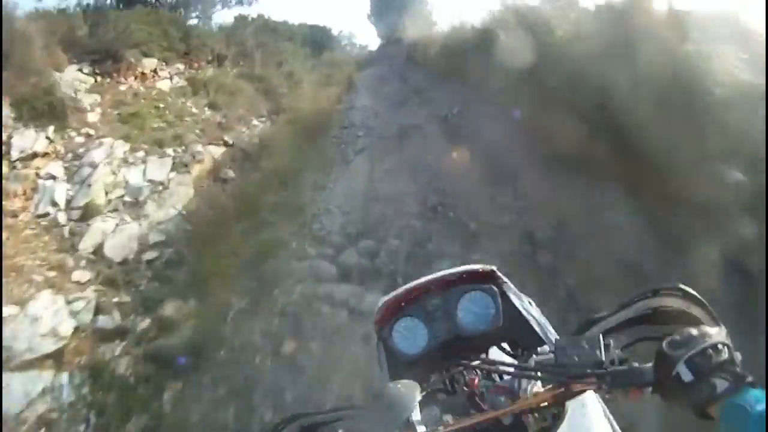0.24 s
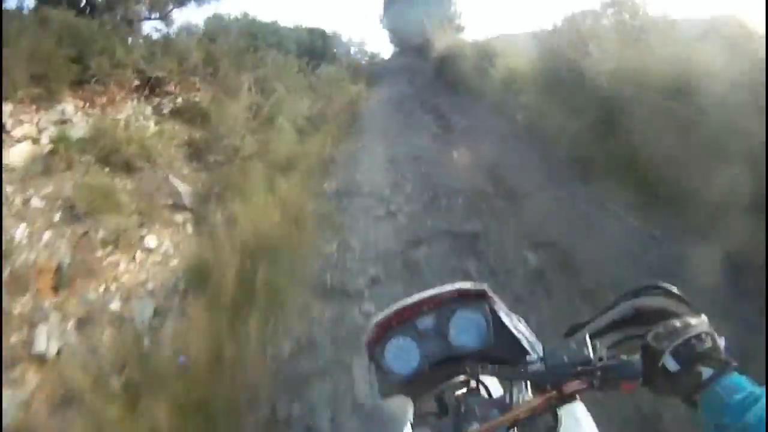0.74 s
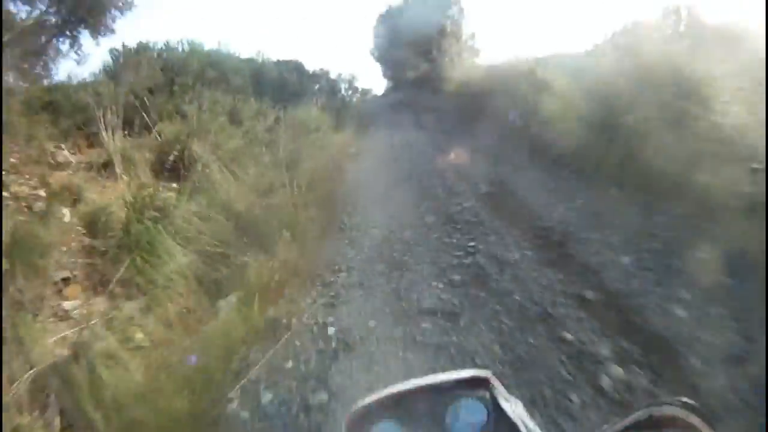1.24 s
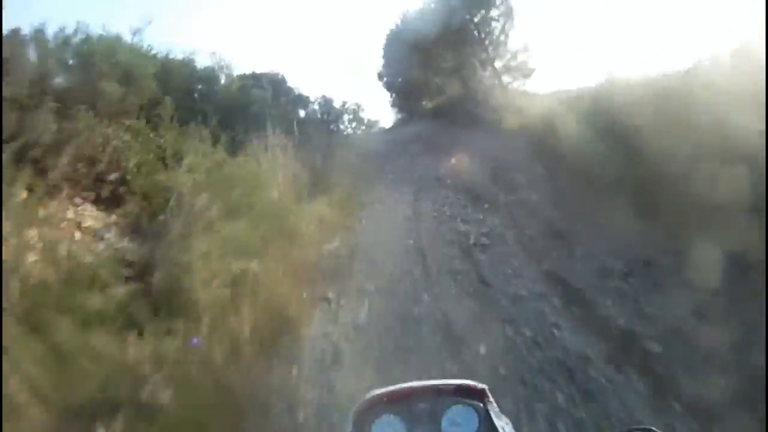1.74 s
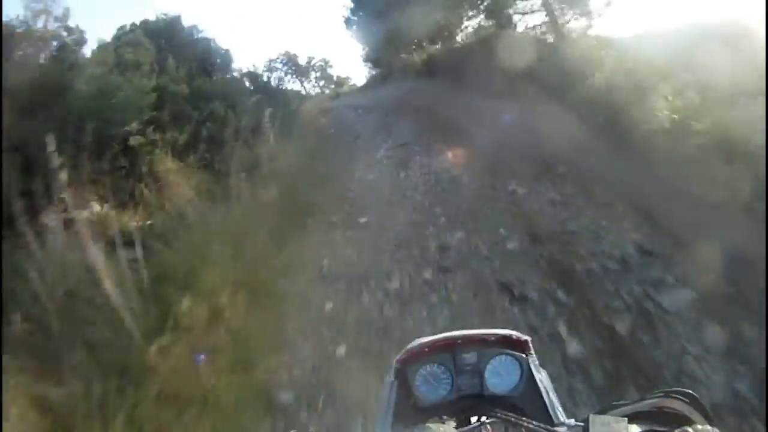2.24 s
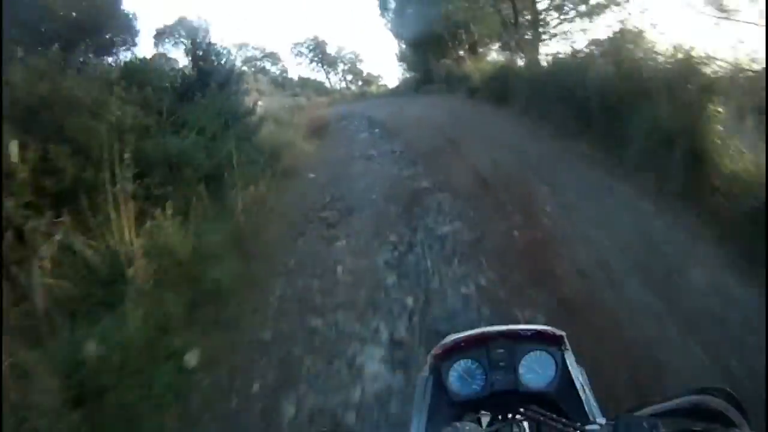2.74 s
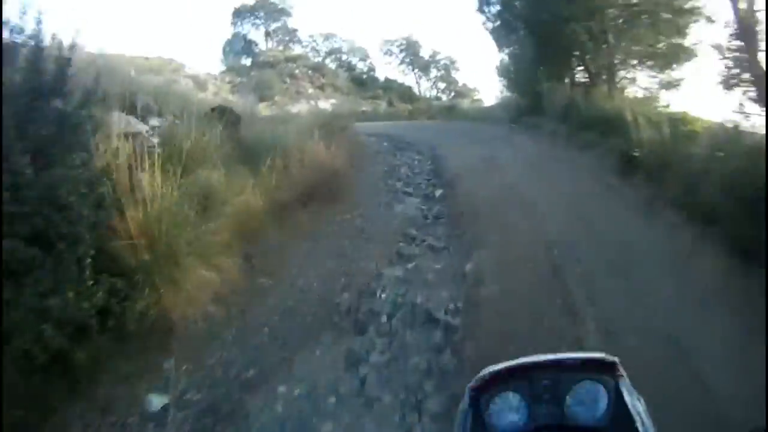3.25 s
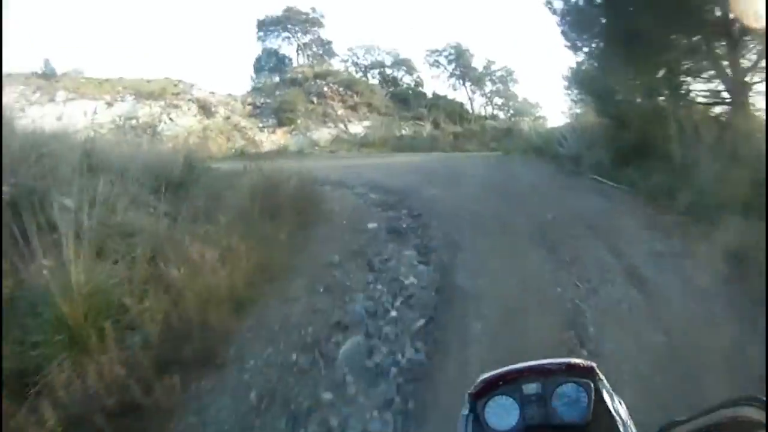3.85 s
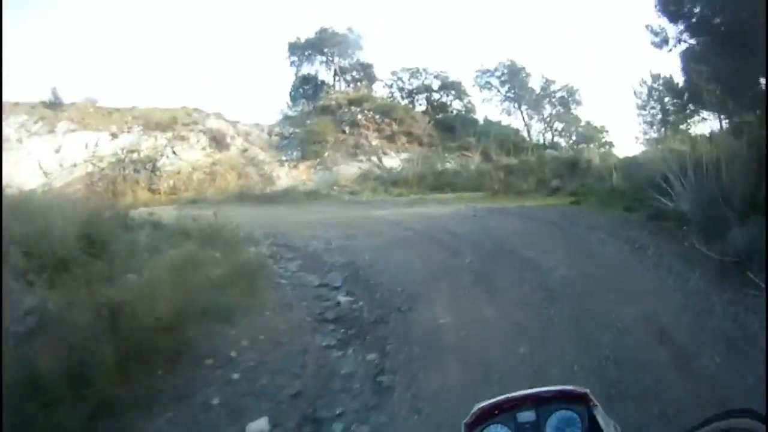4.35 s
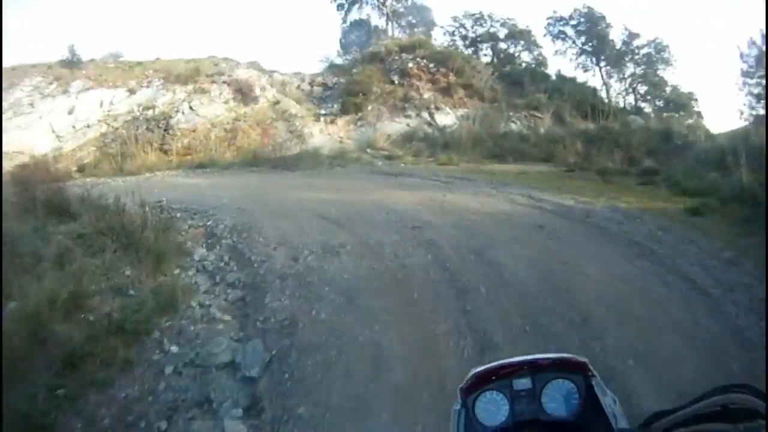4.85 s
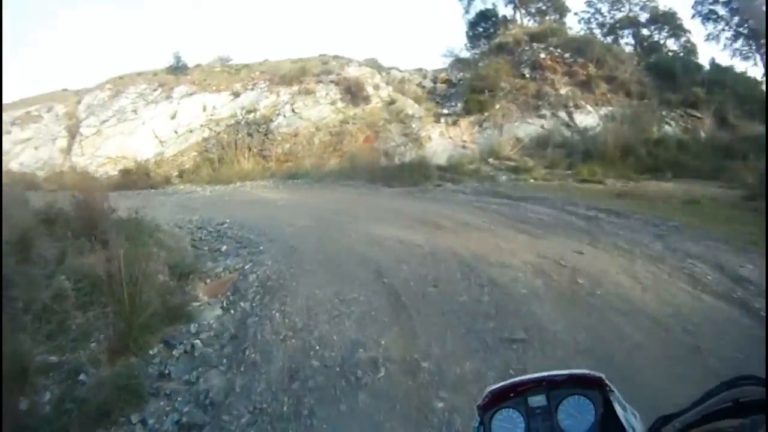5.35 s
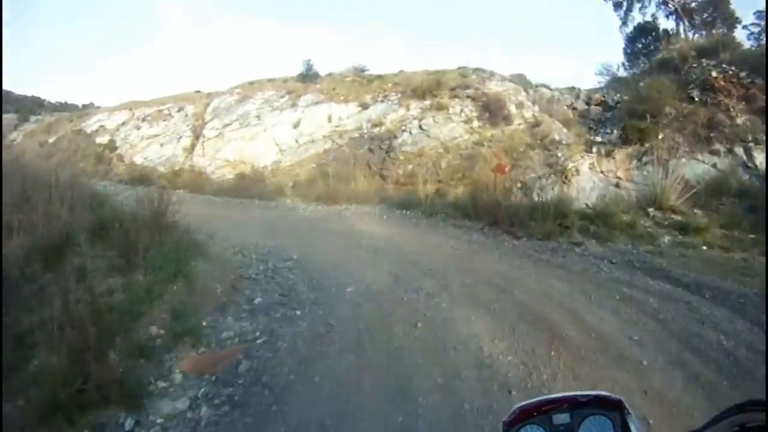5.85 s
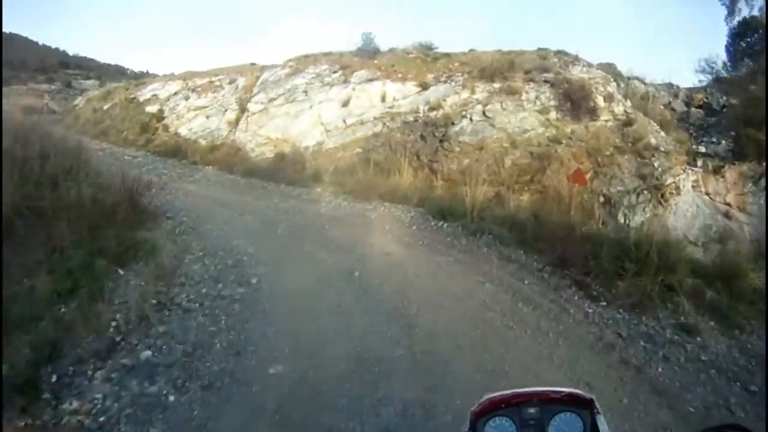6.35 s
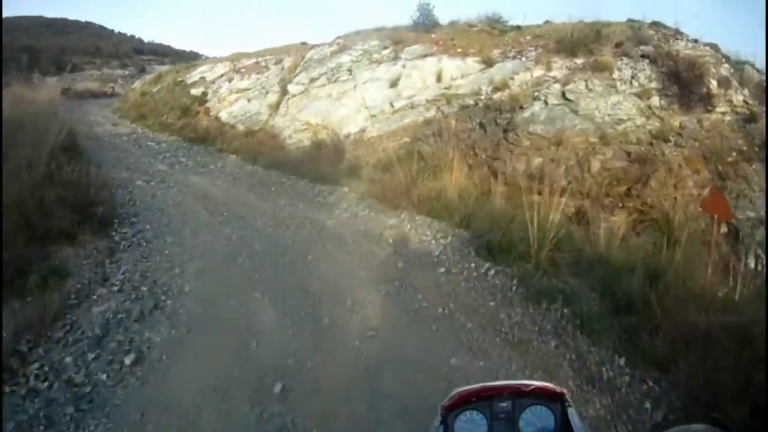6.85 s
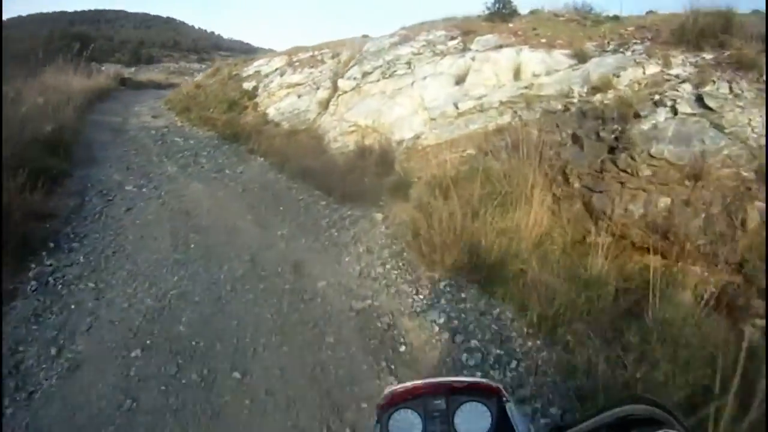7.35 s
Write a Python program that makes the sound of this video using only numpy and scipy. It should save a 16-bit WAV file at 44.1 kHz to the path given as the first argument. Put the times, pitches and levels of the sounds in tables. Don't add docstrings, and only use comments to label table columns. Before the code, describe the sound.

A single-cylinder four-stroke trail bike is heard from onboard through a sealed, padded camera microphone, dry and mono. From 0 to 3.4 s it runs fast, about 25 blows a second, wavering as the rear wheel slips and grips. Throaty exhaust pulses, hard valve clatter and a rough gear whine near 1.2-1.8 kHz sit within strong rushing wind, low gusty booms and sharp gravel spray. At 3.4 s the throttle shuts; the pitch falls, jumps in a blip around 3.85 s with a short buzz, then lugs to about 15 blows a second with misfires until 4.9 s, while wind and stones drop away. From 5 s it pulls in bursts, strongest around 5.4-5.9 and 6.1-6.4 s, with frame knocks and a buzzing metal bracket. Revs dip near 7.25 s, then recover slightly to the end at 7.6 s. Treble is grainy, with a mirrored metallic haze.

```python
import sys
import numpy as np
from scipy import signal
from scipy.fft import rfft, irfft, next_fast_len
from scipy.io import wavfile
from scipy.ndimage import uniform_filter1d, map_coordinates

SR = 44100
rng = np.random.default_rng(int(sys.argv[2]) if len(sys.argv) > 2 else 0)


def invert_db(x):
    u = np.asarray(x, float) / 20
    return 10 ** u


def digitize_waveform(pressure):
    field = np.atleast_2d(pressure).T
    bounded = np.clip(field, -1, 1)
    quanta = np.round(bounded * 32767).astype(np.int16)
    wavfile.write(sys.argv[1], SR, quanta)


N = 335160
SHUT_DB = -51
CRUISE_DB, CRUISE_REVS = -50, 25


def unit(x):
    return x / np.sqrt(np.mean(x ** 2) + 1e-20)


def steady(x):
    return x / np.sqrt(np.abs(uniform_filter1d(x ** 2, size=SR // 2)) + 1e-20)


def curves(rows):
    s, *cols = np.transpose(rows)
    return [np.interp(np.arange(N) / SR, s, c) for c in cols]


def bumps(rows):
    t = np.arange(N) / SR
    return sum(height * np.cos(np.pi * np.clip((t - s) / length, -.5, .5)) ** 2 for s, length, height in rows)


def spells(rows, rest_db, rise, fall):
    t = np.arange(0, N + 64, 64) / SR
    tops = []
    for s, held, db in rows:
        early, late = np.clip(s - t, 0, None), np.clip(t - s - held, 0, None)
        tops.append(db - rise * early - fall * late)
    return np.maximum(rest_db, np.interp(np.arange(N) / SR, t, np.max(tops, axis=0)))


def wobble(rate):
    return map_coordinates(rng.standard_normal(N // 200 + 4), [np.arange(N) * rate / SR])


def grit(spike_db):
    spikes = np.minimum(rng.exponential(1, N), 6.5)
    return unit(rng.standard_normal(N) * invert_db(spike_db * spikes))


def filtered(x, response, top_hz=6600):
    m = next_fast_len(N + SR // 4)
    hz = np.arange(0, top_hz, SR / m)
    return irfft(rfft(x, m)[..., :len(hz)] * response(hz), m)[..., :N]


def slope(points):
    f, db = np.transpose(points)
    return lambda hz: invert_db(np.interp(np.log(hz + 1), np.log(f), db))


def modes(table, sign=1):
    def response(f):
        total = 0
        for k, (c, w, db) in enumerate(table):
            total = total + sign ** k * invert_db(db) * 1j * f * w / (c * c - f * f + 1j * f * w)
        return total
    return response


# t/s, firings a second [1/s]
CRANK_SPEED = [(0.0, 25.62), (1.02, 25.19), (3.35, 24.91), (3.44, 20.04), (3.69, 17.11), (3.89, 26.73),
               (4.28, 18.05), (4.48, 15.7), (4.96, 15.41), (5.04, 19.95), (5.57, 21.41), (6.28, 21.26),
               (6.39, 25.61), (6.74, 25.47), (6.86, 21.26), (7.03, 24.77), (7.28, 18.01), (7.6, 19.94)]
# centre t/s, length/s, extra firings a second [1/s]
WHEELSPIN = [
    (1.29, 0.51, 1.56),
    (1.96, 1.23, 3.3),
    (2.25, 0.76, -3.14),
    (2.44, 0.5, 2.43),
    (3.27, 0.2, 3.08),
    (3.55, 0.29, 1.41),
    (4.77, 0.31, 2.83),
    (5.25, 0.37, -1.42),
    (5.97, 0.49, 5.41),
    (7.35, 0.74, 1.59),
]


def crank_speed():
    return curves(CRANK_SPEED)[0] + bumps(WHEELSPIN)


MISFIRES = [
    3.52,
    4.07,
    4.75,
    4.86,
]


def crank(revs):
    turn = .14 + np.cumsum(revs) / SR
    at = np.flatnonzero(np.diff(np.floor(turn)))
    chance = rng.standard_normal((len(at), 2))
    strength = invert_db(1.08 * chance[:, 0])
    for s in MISFIRES:
        strength[np.argmin(np.abs(at / SR - s))] *= invert_db(-14)
    jitter = (.0008 * SR * chance[:, 1]).astype(int)
    firings = np.zeros(N)
    firings[np.clip(at + jitter, 0, N - 1)] = strength
    return firings


def after(firings, delay, rise):
    u = np.clip(np.arange(SR // 10) / SR - delay, 0, 1) / rise
    return signal.fftconvolve(firings, u * np.exp(1 - u))[:N]


# t/s, held/s, exhaust level/dB
THROTTLE = [(0, 0.0066, -37.5), (.12, .02, -46), (.44, .02, -36), (.55, 0.018, -39.5), (.7, 0.25, -43.5),
            (1.14, 0.089, -42.5), (1.27, 0.25, -38), (2.29, 0.062, -36.5), (2.62, 0.056, -36),
            (2.84, 0.071, -37.5), (3.2, 0.019, -39), (3.45, .02, -54), (3.83, 0.038, -37.5),
            (4.45, 0.14, -48.5), (4.7, .02, -42), (4.8, .03, -46), (4.99, 0.023, -38), (5.12, 0.2, -42.5),
            (5.35, 0.59, -37.5), (6.1, 0.021, -34.5), (6.27, .01, -39), (6.32, 0.037, -34.5),
            (6.65, 0.042, -37.5), (6.88, 0.063, -36), (7.19, 0.0091, -37.5), (7.28, 0.26, -43),
            (7.57, .05, -37.5)]


def throttle():
    return spells(THROTTLE, SHUT_DB, rise=143, fall=64.5) - SHUT_DB


# centre t/s, length/s, level/dB
SLACK = [
    (3.68, .05, 0),
    (4.88, .04, 4),
    (4.95, .07, -4),
    (6.24, .05, -7),
    (6.29, .03, -8),
    (7.22, 0.076, -13),
]


def chain_slack():
    return bumps(SLACK)


# f/Hz, width/Hz, level/dB
PIPE = [(236, 48, 0), (295, 45, -4), (415, 70, -3), (538, 32, 0), (605, 28, -3)]
# f/Hz, level/dB
PIPE_EDGE = [(120, -14), (200, 0), (640, 0), (800, -9), (1500, -26)]
# f/Hz, width/Hz, level/dB
THUD = [(52.5, 11, 5.5), (98.2, 11.4, -1)]


def exhaust(firings, level_db):
    def silencer(f):
        late = np.exp(-2j * np.pi * f * .005 * np.clip(f / 600, 0, 1))
        echo = 1 + .22 * np.exp(-2j * np.pi * f * .017)
        return modes(PIPE, sign=-1)(f) * slope(PIPE_EDGE)(f) * late * echo

    blow = unit(filtered(firings, silencer))
    thud = unit(filtered(firings, modes(THUD)))
    turbulence = after(firings, 0, .0028) * rng.standard_normal(N)
    gas = unit(filtered(turbulence, modes(PIPE, sign=-1.64)))
    return invert_db(level_db) * (blow + invert_db(-11) * gas) + invert_db(level_db + 1.5) * thud


# f/Hz, width/Hz, level/dB
CASE = [(1000, 170, -52.5), (1185.7, 26.4, 21), (1226, 55, 18.5), (1401, 180, 11.5), (1408, 140, 12),
        (1490, 30, 9), (1685, 53, -9)]
# f/Hz, level/dB
CASE_EDGE = [(600, -20), (900, -9), (1080, 0), (1800, 0), (2600, -14), (4000, -30)]
# centre t/s, length/s, level/dB
LASH = [
    (.56, 0.084, 1),
    (1.5, 0.34, 2.5),
    (1.75, 0.34, -3),
    (2.1, 0.38, -2),
    (3.5, 0.21, 5),
    (4.55, 0.37, -3.5),
    (5.42, 1, -4.5),
    (6.4, 0.38, 2),
    (6.95, 0.49, 2.5),
    (7.45, .4, 0),
]


def clatter(firings, revs, load_db, pace_db, slack_db):
    level_db = -29.5 + .42 * (revs - CRUISE_REVS) + .24 * load_db + .22 * pace_db
    level_db = level_db + slack_db + bumps(LASH)
    beat = .6 + .7 * after(firings, .006, .006)
    drive = beat * invert_db(1.2 * wobble(40)) * grit(spike_db=2.5)
    case = lambda f: modes(CASE)(f) * slope(CASE_EDGE)(f)
    return invert_db(level_db) * steady(filtered(drive, case))


# t/s, drive wind-up f/Hz, level/dB, speed ripple of one firing [0-1]
MESH = [(0, 0, -36, .08), (3.3, -40, -36, .08), (3.4, 40, -29, .03), (3.46, 70, -28, .03),
        (3.55, -20, -30, .04), (3.74, -110, -32, .05), (3.9, 30, -36, .1), (4.05, 10, -32, .04),
        (4.65, 50, -47, .05), (4.7, 50, -29, .12), (4.8, 0, -30, .1), (4.92, 80, -32, .1),
        (5.1, -40, -28, .15), (5.4, 35, -29, .15), (7.17, -10, -33, .09), (7.25, -110, -27, .07),
        (7.31, 30, -29, .1), (7.6, -30, -33, .1)]
# f/Hz, level/dB
GEARBOX = [(950, -22), (1120, 0), (1290, 0), (1335, -11), (1380, 0), (1540, -2), (1640, -18), (1900, -28)]


def whine(firings, revs):
    windup_hz, level_db, kick = curves(MESH)
    mean_hz = 68 * uniform_filter1d(revs, size=round(.16 * SR)) + windup_hz
    kicks = np.cumsum(firings)
    ripple = uniform_filter1d(kicks - uniform_filter1d(kicks, size=SR // 6), size=SR // 100)
    mesh_hz = mean_hz * (1 + kick * ripple + .004 * wobble(70))
    mesh = 2 * np.pi * np.cumsum(mesh_hz) / SR
    piston = 1 + .45 * np.sin(mesh / 17 + wobble(8)) + .25 * np.sin(mesh / 34 + wobble(8))
    bite = 1 + 2.5 * kick * (1.7 * after(firings, 0, .011) - 1)
    tone = bite * piston * invert_db(2 * wobble(40)) * np.sin(mesh)
    return invert_db(level_db + 2.5) * filtered(tone, slope(GEARBOX))


# t/s, length/s, level/dB
BUZZ = [
    (3.85, .14, -51),
    (5.36, .82, -48.5),
    (6.3, .82, -48.5),
    (7.45, .03, -54),
]
# f/Hz, width/Hz, level/dB
BRACKET = [(3080, 90, 0), (3670, 110, -1), (4610, 75, 0), (5400, 100, -4)]


def bracket(firings):
    uneven = firings * invert_db(1.5 * rng.standard_normal(N))
    jolts = after(uneven, .012, .002) + .7 * after(uneven, .034, .002)
    chatter = jolts * (1 + rng.standard_normal(N)) * rng.standard_normal(N)
    level_db = spells(BUZZ, rest_db=-75, rise=250, fall=250)
    return invert_db(level_db) * unit(filtered(chatter, lambda f: modes(BRACKET, sign=-1)(f) ** 2))


# t/s, peak level/dB, thump level/dB
KNOCKS = [(0.46, -12, -14), (1.406, -1, -31), (2.26, -8, -25), (3.785, -9, -11), (4.32, -18, -14),
          (4.675, -16, -8), (4.898, -30, -20), (4.988, -16, -19), (5.345, -23, -20), (5.672, -9.5, -16),
          (5.852, -12, -19), (6.267, -11, -16), (6.304, -13, -25), (6.316, -6.5, -24), (6.632, -15, -7),
          (6.88, -15, -19), (6.929, -11, -15), (7.187, -10, -14)]
# f/Hz, width/Hz, level/dB
FRAME = [(850, 600, -11), (1200, 300, 0), (1500, 300, -2), (2150, 500, -8), (3600, 900, -20)]


def knocks():
    t = np.arange(SR // 20) / SR
    hard, soft = np.zeros(N + SR), np.zeros(N + SR)
    for s, db, thump_db in KNOCKS:
        burst = invert_db(db - 60 * t / .03) * (1 - np.exp(-t / .001)) * rng.standard_normal(len(t))
        hard[round(s * SR):][:len(t)] += burst
        soft[round(s * SR):][:len(t)] += invert_db(thump_db) * burst
    knock = filtered(hard[:N], modes(FRAME, sign=-1))
    thump = filtered(soft[:N], modes(PIPE, sign=-1))
    return invert_db(9) * (knock + thump)


# f/Hz, width/Hz, level/dB
SHELL = [(1720, 15, -13), (2022, 175, -1.5), (2223, 157, 1), (2530, 120, -30)]
# f/Hz, level/dB
SHELL_EDGE = [(1200, -16), (1700, 0), (2500, 0), (3800, -8), (4200, -20)]


def shell(firings, pace_db, load_db):
    level_db = -35.5 + .68 * pace_db + .27 * load_db
    shake = .6 + .65 * after(firings, .004, .004)
    drive = shake * invert_db(1.6 * wobble(30)) * grit(spike_db=1.0)
    ring = lambda f: modes(SHELL, sign=-1)(f) * slope(SHELL_EDGE)(f)
    return invert_db(level_db) * steady(filtered(drive, ring))


# t/s, level/dB
PACE = [(0, -46.5), (.7, -47), (1.27, -46.5), (1.6, -45.5), (2.1, -49), (2.8, -52), (3.26, -50),
        (3.66, -57.5), (3.83, -52.5), (4.27, -61.5), (4.76, -69), (5.14, -65), (5.86, -58.5), (6.16, -61),
        (6.39, -59), (6.86, -62), (7.2, -64), (7.6, -67.5)]


def road_pace():
    return curves(PACE)[0] - CRUISE_DB


# f/Hz, width/Hz, level/dB
STONES = [(2780, 100, -1.5), (3070, 300, -5.5), (3550, 254, -3), (4610, 770, -12), (5290, 190, -14)]


def stones(pace_db):
    spray = steady(filtered(invert_db(wobble(14)) * grit(spike_db=3.0), modes(STONES)))
    return invert_db(CRUISE_DB + pace_db + 14.5) * spray


# f/Hz, level/dB
RUSH = [(20, -11), (120, -4.5), (300, -1), (700, -8.5), (1200, 1), (2500, -1.5), (3700, -14.5), (4100, -63),
        (5600, -18)]


def wind_rush(firings, pace_db, load_db):
    level_db = -31 + .91 * pace_db + .26 * load_db
    depth = np.clip(.018 * load_db, 0, .7)
    puff = 1 + depth * (2.0 * after(firings, .002, .006) - 1)
    air = unit(filtered(invert_db(2.55 * wobble(16)) * rng.standard_normal(N), slope(RUSH)))
    return invert_db(level_db) * puff * air


# t/s, boom level/dB
GUSTS = [(0, -16.5), (.23, -14.5), (.47, -17), (.6, -17.5), (.74, -16.5), (1.02, -25), (1.27, -23),
         (1.44, -19.5), (1.58, -23), (1.8, -23.5), (2.03, -19.5), (2.26, -18), (2.61, -20.5), (3.09, -23),
         (3.49, -24.5), (3.65, -22.5), (4.0, -32), (4.3, -29), (4.7, -31.5), (5.06, -30.5), (5.3, -31.5),
         (5.86, -30), (6.3, -34), (6.39, -34), (6.62, -33), (7.05, -30.5), (7.37, -29.5)]
# t/s, boom level/dB
LULL = [
    (0, -28),
    (2.2, -25),
    (2.8, -29.5),
    (4.4, -33.5),
    (5.7, -35),
    (7.6, -37),
]
# f/Hz, width/Hz, level/dB
BOOM = [(39.4, 30.4, -6), (88.4, 17.7, 1.5)]


def wind_boom():
    gusts = [(s, 0, db) for s, db in GUSTS]
    level_db = spells(gusts, rest_db=curves(LULL)[0], rise=76, fall=74)
    pressure = invert_db(1.7 * wobble(14)) * rng.standard_normal(N)
    return invert_db(level_db - 1.5) * steady(filtered(pressure, modes(BOOM, sign=-1.15)))


def scene():
    revs = crank_speed()
    firings = crank(revs)
    load_db, slack_db, pace_db = throttle(), chain_slack(), road_pace()
    engine = exhaust(firings, SHUT_DB + load_db + slack_db)
    engine += clatter(firings, revs, load_db, pace_db, slack_db)
    engine += whine(firings, revs)
    rattles = bracket(firings) + knocks() + shell(firings, pace_db, load_db)
    surroundings = stones(pace_db) + wind_rush(firings, pace_db, load_db) + wind_boom()
    return (engine + rattles + surroundings)[None]


def top_cut(x):
    return signal.sosfilt(signal.butter(12, 15740, fs=SR, output="sos"), x)


# f/Hz, level/dB
FILTER_EDGE = [(5300, -1), (5700, -7.5), (6000, -19)]


def record(dry):
    slow = signal.resample(filtered(dry, slope(FILTER_EDGE)), N * 12000 // SR, axis=1)
    held = signal.resample(np.repeat(slow, repeats=4, axis=1), N, axis=1)
    mix = filtered(held, np.ones_like, top_hz=15300)
    return top_cut(mix)


dry = scene()
out = record(dry)
digitize_waveform(out)
```